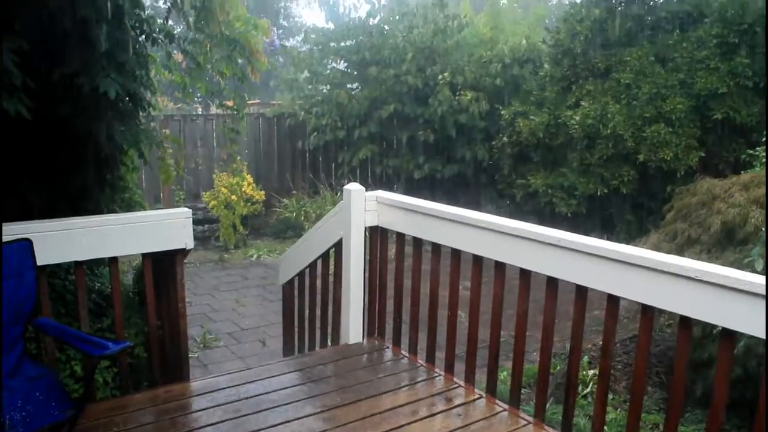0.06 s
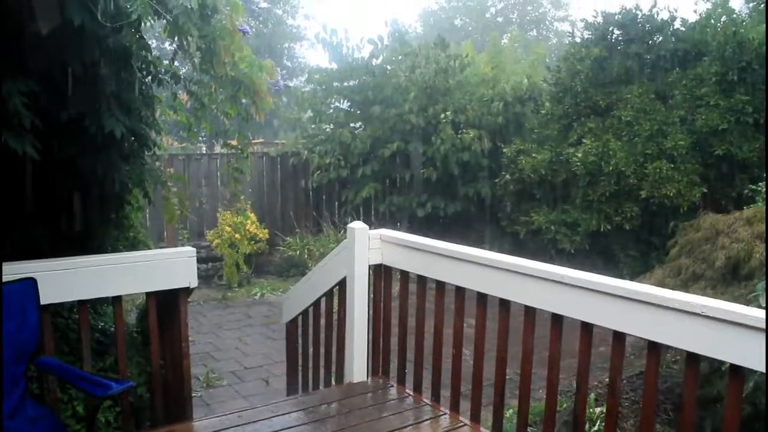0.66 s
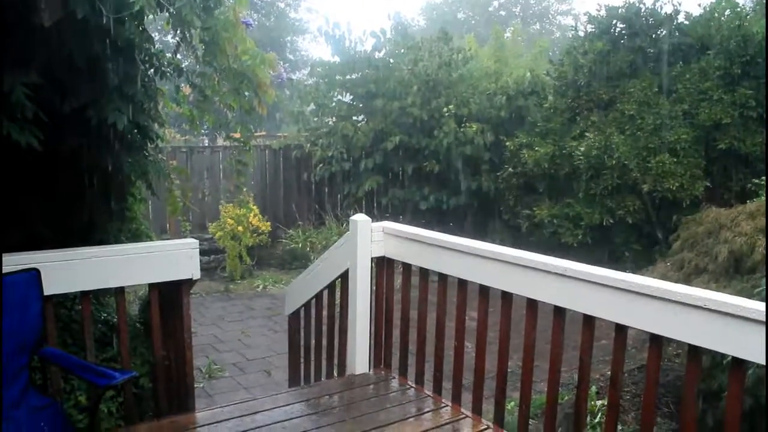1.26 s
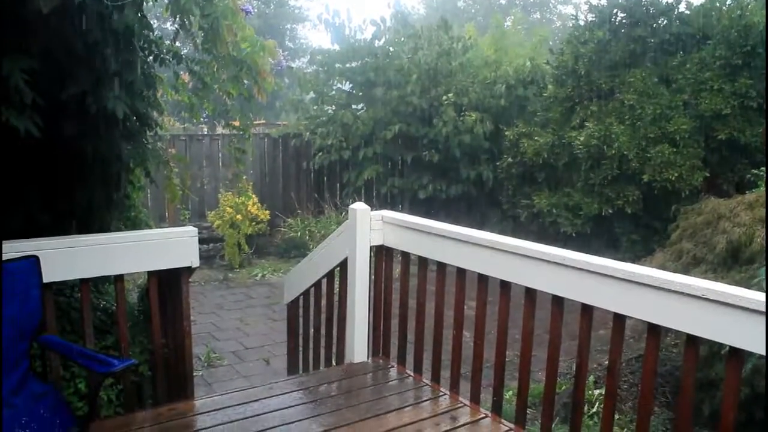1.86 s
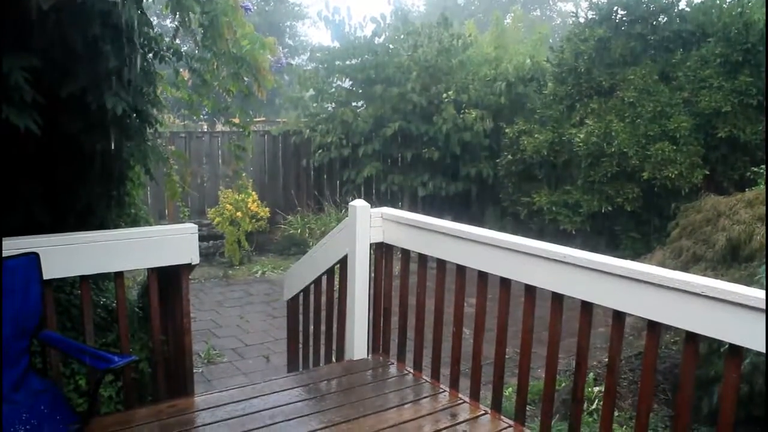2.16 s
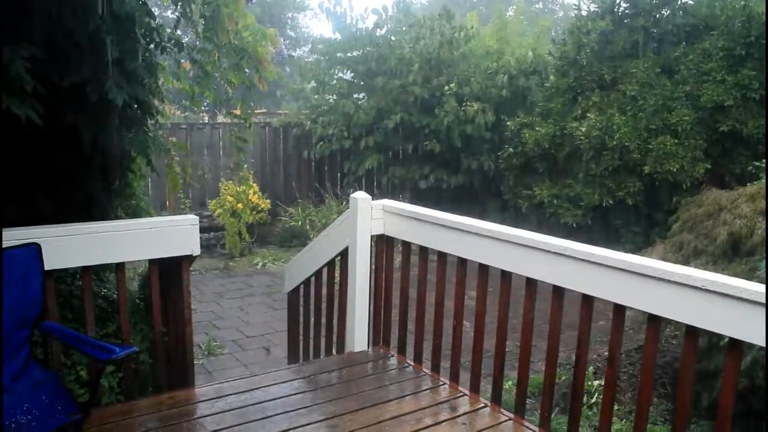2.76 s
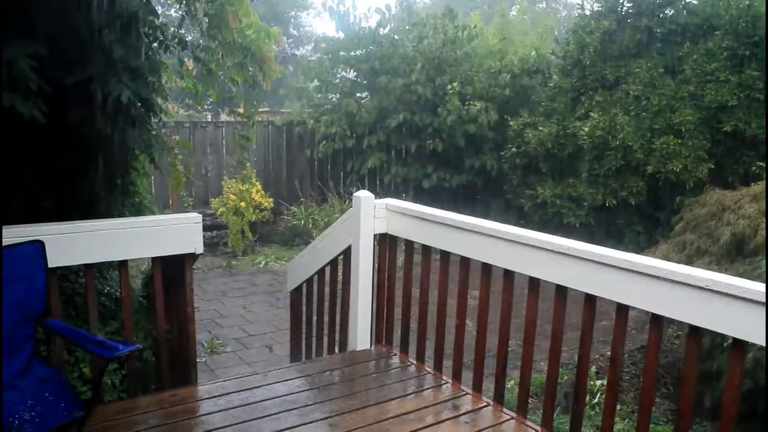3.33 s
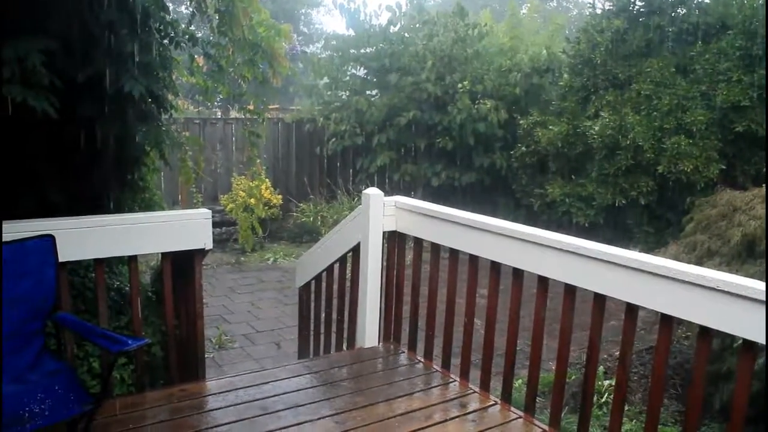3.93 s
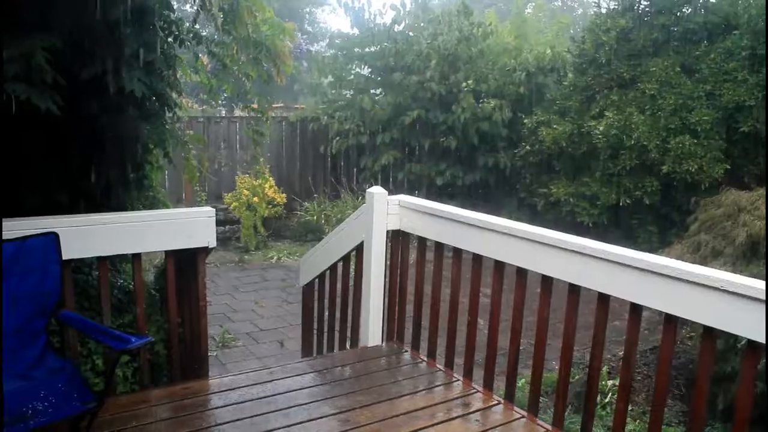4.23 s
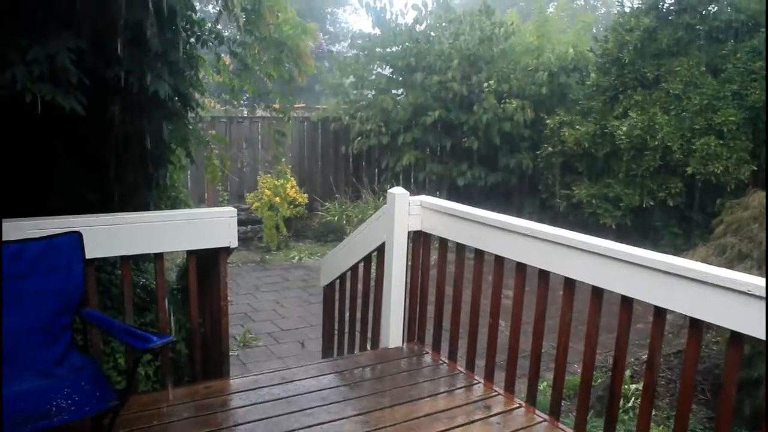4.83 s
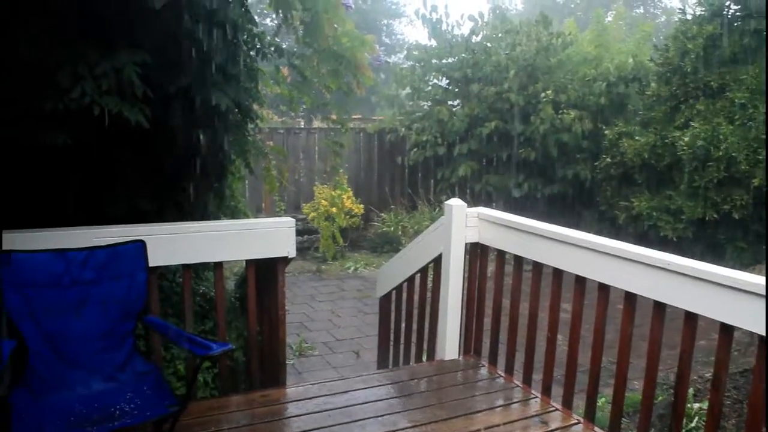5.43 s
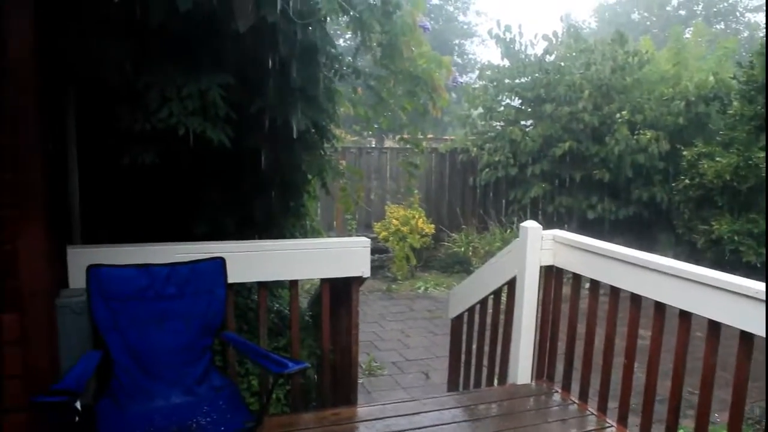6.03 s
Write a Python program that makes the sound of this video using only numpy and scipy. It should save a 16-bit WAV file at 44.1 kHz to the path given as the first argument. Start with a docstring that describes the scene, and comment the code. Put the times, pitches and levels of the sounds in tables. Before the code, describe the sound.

Steady heavy rain with splashes and sharp drips grows hollow and dull under a finger on the microphone, then partly clears.

```python
"""Heavy rain on a wooden deck, a paved yard and trees, heard from a porch: a wash of far drops, near
patter, bursting gobs of run-off, sharp ticks and a few bubble plinks. A finger slides over the single
microphone port and lowers its resonance, so the rain turns hollow, then muffled. The finger rubs and
bumps the case, then lifts a little. A faint low hum swells about halfway through."""
import sys
import numpy as np
from scipy import signal
from scipy.fft import rfft, irfft, next_fast_len
from scipy.io import wavfile
from scipy.ndimage import uniform_filter1d, map_coordinates

SR = 44100
rng = np.random.default_rng(int(sys.argv[2]) if len(sys.argv) > 2 else 0)


def to_wav(sig):
    """Store sig (one row per channel, or 1-D mono) as 16-bit WAV at the path in sys.argv[1].

    Samples outside -1..1 are clipped; the rate is SR.
    """
    pcm = np.clip(np.atleast_2d(sig), -1, 1) * 32767
    pcm = np.round(pcm).astype(np.int16)
    wavfile.write(sys.argv[1], SR, pcm.T)  # frames by channels


N = 272979
TOP_HZ = 15740  # upper edge of the whole sound


def amp(db):
    """Decibels to gain."""
    return 10 ** (np.asarray(db) / 20)


def unit(x):
    """x scaled to rms 1."""
    return x / np.sqrt(np.mean(x ** 2) + 1e-20)


def wobble(rate):
    """A smooth random curve, rate knots a second."""
    return map_coordinates(rng.standard_normal(400), [np.arange(N) * rate / SR], mode="wrap")


def filtered(x, response):
    """x through a filter whose gain is a function of frequency in Hz."""
    size = next_fast_len(len(x) + 8192)
    return irfft(rfft(x, size) * response(np.fft.rfftfreq(size, 1 / SR)), size)[:len(x)]


def coloured(x, spectrum):
    """x through an EQ curve of (Hz, dB) points, at rms 1."""
    f, db = np.transpose(spectrum)
    return unit(filtered(x, lambda hz: amp(np.interp(np.log(hz + 1), np.log(f), db))))


def low_cut(x, corner_hz):
    """Second-order high-pass: small things radiate little bass."""
    return filtered(x, lambda f: (1j * f / (corner_hz + 1j * f)) ** 2)


def add(track, start_s, sound):
    """Mixes a sound into the track."""
    part = track[max(round(start_s * SR), 0):][:len(sound)]
    part += sound[:len(part)]


def drops(count, pitch_hz, octaves, cycles, spread_db, samples):
    """Random impacts, each a few dying cycles; a few land near and loud, most far and soft."""
    when, distance, life = rng.random((count, 3)).T
    hz = np.clip(pitch_hz * 2 ** (octaves * rng.standard_normal(count)), 100, TOP_HZ)[:, None]
    gain = amp(-spread_db * np.log(distance + .015))[:, None]
    turns = hz * np.arange(samples) / SR
    grains = gain * np.sin(2 * np.pi * turns) * np.exp(-turns / (cycles * (.5 + life[:, None])))
    index = (when * N).astype(int)[:, None] + np.arange(samples)
    return unit(np.bincount(index.ravel(), grains.ravel(), N)[:N])


# The EQ of the far rain. Each row: frequency in Hz, relative level in dB.
WASH_SPECTRUM = [(25, -36), (60, -25.5), (110, -19.6), (165, -8.5), (290, -3.2), (370, -3), (520, 1.3),
                 (750, -2.2), (1050, -1.3), (2100, -1.7), (3200, -3.1), (5000, -3), (9500, -5.2),
                 (12500, -11.1), (15500, -23.2)]


def rain(level_db=-28.6):
    """Far drops merge into a wash; nearer ones crackle on stone, spit on boards and tap on leaves."""
    noise = signal.stft(rng.standard_normal(N), nperseg=512)[2]
    patches = uniform_filter1d(rng.standard_normal(noise.shape), 24, axis=0)
    shimmer_db = 0.95 * unit(uniform_filter1d(patches, 9, axis=1))  # drifts by band and by moment
    wash = coloured(signal.istft(noise * amp(shimmer_db), nperseg=512)[1][:N], WASH_SPECTRUM)
    crackle = drops(count=11000, pitch_hz=6570, octaves=0.51, cycles=0.94, spread_db=3.5, samples=80)
    spits = drops(count=2200, pitch_hz=9800, octaves=0.15, cycles=2.2, spread_db=6.3, samples=60)
    taps = drops(count=2500, pitch_hz=1183, octaves=0.707, cycles=2.6, spread_db=4.5, samples=700)
    flurry = np.tanh(1.1 * wobble(15) + .5 * wobble(5.1))  # the near patter comes in surges
    near = amp(-7.5 + 3.3 * flurry) * crackle + amp(-13 + 0.82 * flurry) * spits + amp(-15) * taps
    return amp(level_db + 0.3 * wobble(7)) * (wash + low_cut(near, corner_hz=443))


# Large gobs of run-off hitting the boards.
# Each row: start in seconds, level in dB, centre frequency in Hz, swell time in seconds.
LARGE_GOBS = [(.255, -27, 4470, .017), (.76, -25.3, 3800, .016), (1.23, -29.5, 6100, .025),
              (1.446, -29.7, 2600, .014), (2.109, -31, 4180, .01), (2.315, -26, 3700, .015),
              (2.965, -29, 3940, .017), (3.204, -27, 4480, .008), (3.485, -31, 3540, .02),
              (3.841, -31, 2800, .014), (3.9, -32, 1900, .03), (4.292, -29, 1690, .017),
              (5.04, -28.5, 1700, .018), (5.515, -27, 3300, .01), (5.66, -25.5, 3800, .026),
              (6.048, -29, 4700, .011)]


def splashes(sharpness=1.25, grit_db=2.0, small_count=14, small_db=-35, small_hz=4600, small_swell_s=.012):
    """Gobs of water burst into spray that swells and thins; small ones fall at random among the large."""
    out, t = np.zeros(N), np.arange(SR // 4) / SR
    starts = (np.arange(small_count) + rng.random(small_count)) / small_count * N / SR
    small_gobs = [(start, small_db + 2 * size, small_hz * 2 ** (.35 * pitch), small_swell_s)
                  for start, (size, pitch) in zip(starts, rng.standard_normal((small_count, 2)))]
    for start, db, hz, swell in small_gobs + list(LARGE_GOBS):
        grit = rng.standard_normal(len(t)) * amp(grit_db * rng.standard_normal(len(t)))
        # a broad band-pass around the gob's centre frequency
        spray = filtered(grit, lambda f: (1j * f * hz / (sharpness * (hz * hz - f * f) + 1j * f * hz)) ** 2)
        add(out, start, amp(db) * unit(spray) * t / swell * np.exp(1 - t / swell))
    return out


# Close drops on the wet deck. Each row: start in seconds, level in dB before the trim, pitch in Hz.
LOUD_TICKS = [(0.7014, -11, 9580), (1.4466, -12, 6400), (1.9315, -9, 3830), (3.2056, -7, 5290),
              (3.3169, -10, 4320), (3.6511, -11, 4210)]


def ticks(loud_trim_db=-1, soft_db=-14.5, soft_hz=5200, octaves=.25, cycles=1.9, soft_count=12):
    """Close drops tick sharply on the boards: a few loud ones, and softer ones at random."""
    out, t = np.zeros(N), np.arange(SR // 100) / SR
    soft = [(when * N / SR, soft_db, soft_hz * 2 ** (octaves * (2 * pitch - 1)))
            for when, pitch in rng.random((soft_count, 2))]
    loud = [(start, db + loud_trim_db, hz) for start, db, hz in LOUD_TICKS]
    for start, db, hz in soft + loud:
        add(out, start, amp(db) * np.sin(2 * np.pi * hz * t) * np.exp(-hz * t / cycles))
    return out


# The finger's move over the microphone port. Each row: time in seconds, open share from 0 to 1.
PORT_OPENING = [(0, 1), (1.2, .385), (2.0, .206), (3.0, .148), (3.5, .082), (3.87, .048), (4.1, .028),
                (4.25, .015), (4.35, .014), (4.43, .0108), (4.95, .0106), (5.31, .0113), (5.36, .0155),
                (5.48, .015), (5.64, .05), (5.82, .051), (6.19, .067)]


def opening(t):
    """The share of the port that the finger leaves free at times t; it glides by equal ratios."""
    times, share = np.transpose(PORT_OPENING)
    return np.exp(np.interp(t, times, np.log(np.maximum(share, 1e-4))))


def port_response(f, share, open_hz=15000, radiation_hz=10000, choke_hz=2700, leak_db=-50):
    """A Helmholtz resonator: a narrowing gap lowers and sharpens its note, until friction dulls it."""
    note = open_hz * np.sqrt(share)
    radiation = note / radiation_hz
    friction = (choke_hz / note) ** 4.9  # takes over steeply as the slit closes
    resonance = 1 / (1 - (f / note) ** 2 + 1j * (radiation + friction) * f / note)
    return resonance - amp(leak_db)  # a little leaks through the case


def through_port(x, neutral_share=.64):
    """The port sweeps the sound like a moving filter; at the neutral share it passes unchanged."""
    f, t, spectra = signal.stft(x, SR, nperseg=512, noverlap=384)
    sweep = port_response(f[:, None], opening(t)) / port_response(f[:, None], neutral_share)
    return signal.istft(spectra * sweep, SR, nperseg=512, noverlap=384)[1][:N]


# Drips into puddles. Each row: start in seconds, level in dB, starting pitch in Hz.
PUDDLE_DRIPS = [(1.352, -26, 1145), (1.775, -31, 995), (2.802, -30, 715)]


def plinks(swell_s=0.005, rise_per_s=1.0):
    """Drips trap bubbles whose pitch rises as they surface."""
    out, t = np.zeros(N), np.arange(SR // 12) / SR
    envelope = t / swell_s * np.exp(1 - t / swell_s)
    for start, db, hz in PUDDLE_DRIPS:
        add(out, start, amp(db) * envelope * np.sin(2 * np.pi * hz * t * (1 + rise_per_s * t)))
    return out


def hum(swell_at_s=3.2, rise_s=.3, level_db=-62.5, before_db=-9, pitch_hz=82.5):
    """A faint low hum swells and holds, wavering a little in level and pitch."""
    swell = np.clip((np.arange(N) / SR - swell_at_s) / rise_s, 0, 1)
    gain = amp(level_db + before_db * (1 - swell) + 1.4 * wobble(5))
    hz = pitch_hz + 2.5 * wobble(13)
    return gain * np.sin(2 * np.pi * np.cumsum(hz) / SR)


# The EQ of rubbing heard through the case. Each row: frequency in Hz, relative level in dB.
RUB_SPECTRUM = [(15, -15), (35, -9), (55, -3), (80, -1), (150, -18), (400, -26), (1500, -60)]


def finger_rub(level_db=-57, judder_db=2.5, contact_share=.014):
    """The fingertip rubs the case with an uneven low rumble while the port is almost shut."""
    pressing = 1 / (1 + (opening(np.arange(N) / SR) / contact_share) ** 8)
    gain = pressing * amp(level_db + judder_db * wobble(14))
    return gain * coloured(rng.standard_normal(N), RUB_SPECTRUM)


# The finger's knocks on the case. Each row: start in seconds, level in dB, pitch in Hz.
CASE_BUMPS = [(4.377, -36, 130), (4.545, -33, 170), (4.552, -29, 170), (4.76, -28, 70), (4.772, -20, 110)]


def finger_bumps(swell_cycles=0.19, scuff_db=-14.5, scuff_hz=750):
    """The soft finger bumps the case: heavily damped thuds, each with a dull scuff."""
    out, t = np.zeros(N), np.arange(SR // 10) / SR
    for start, db, hz in CASE_BUMPS:
        age = hz * t / swell_cycles
        scuff = unit(filtered(rng.standard_normal(len(t)), lambda f: 1 / (1 + (f / scuff_hz) ** 4)))
        thud = -np.sin(2 * np.pi * hz * t)
        add(out, start, amp(db) * age * np.exp(1 - age) * (thud + amp(scuff_db) * scuff))
    return low_cut(out, corner_hz=22)


def scene():
    """Water and hum pass through the port, handling noise through the case; both channels are alike."""
    water = rain() + low_cut(splashes() + ticks() + plinks(), corner_hz=297)
    mono = through_port(water + hum()) + finger_rub() + finger_bumps()
    return np.array([mono, mono])


def record(dry):
    """A brick-wall low-pass takes off the very top."""
    return np.array([filtered(channel, lambda hz: hz < TOP_HZ) for channel in dry])


dry = scene()
out = record(dry)
to_wav(out)
```